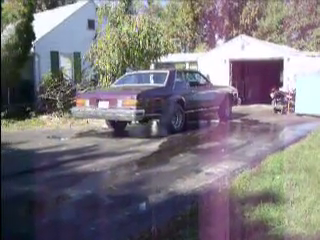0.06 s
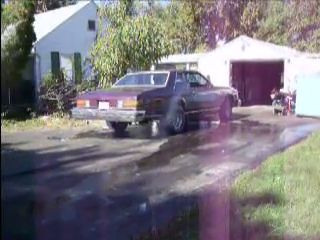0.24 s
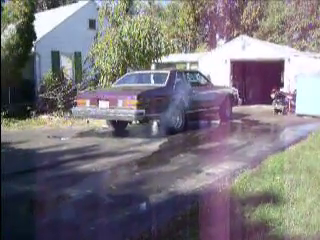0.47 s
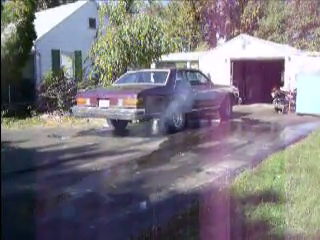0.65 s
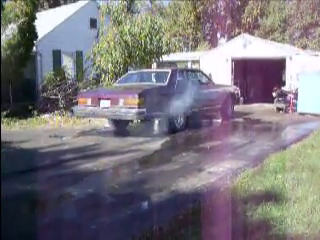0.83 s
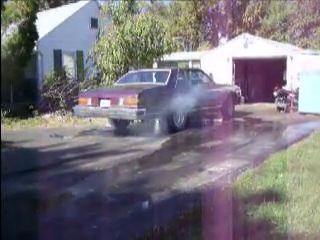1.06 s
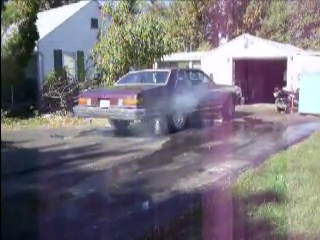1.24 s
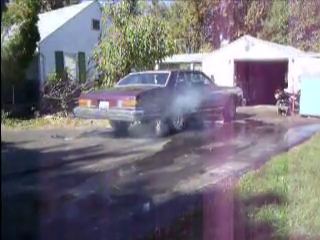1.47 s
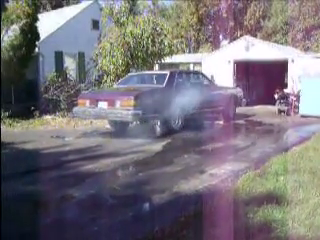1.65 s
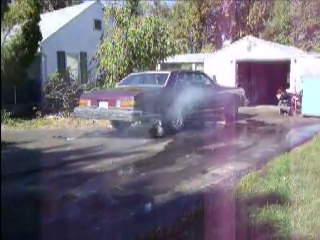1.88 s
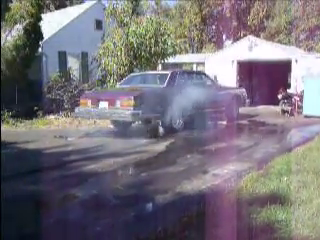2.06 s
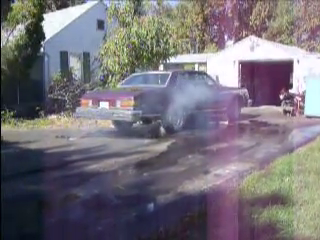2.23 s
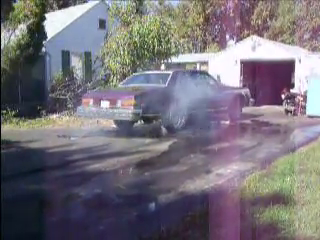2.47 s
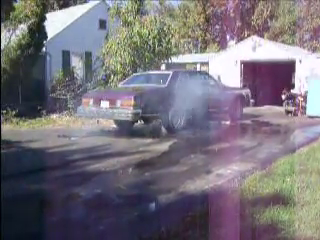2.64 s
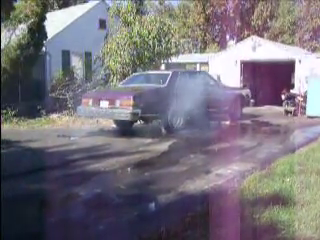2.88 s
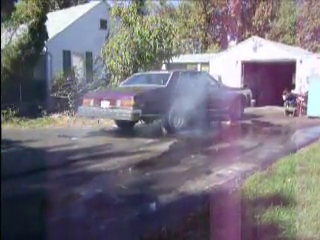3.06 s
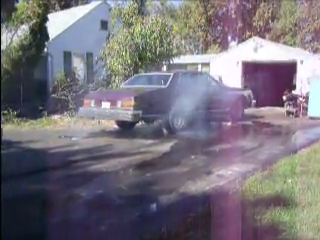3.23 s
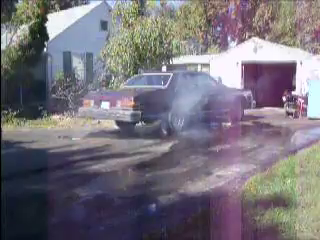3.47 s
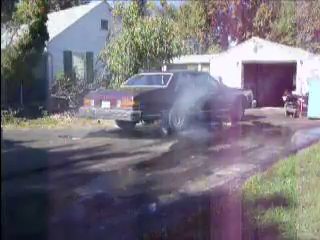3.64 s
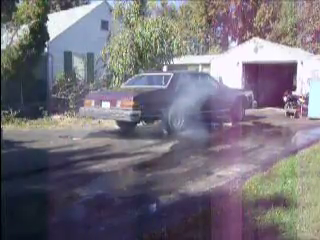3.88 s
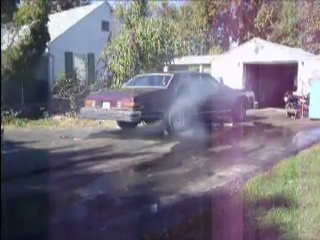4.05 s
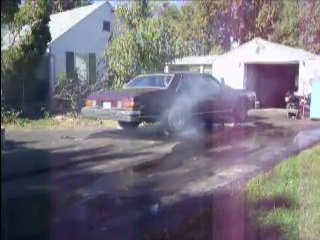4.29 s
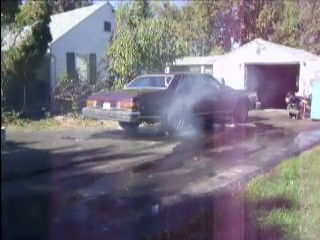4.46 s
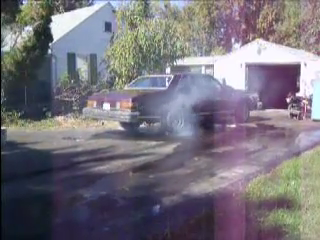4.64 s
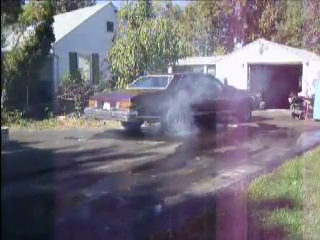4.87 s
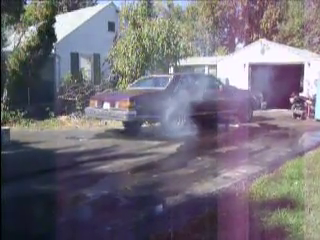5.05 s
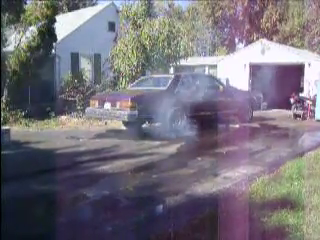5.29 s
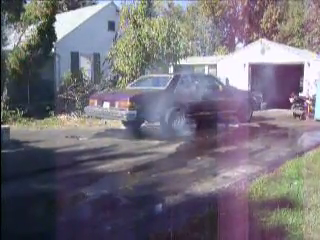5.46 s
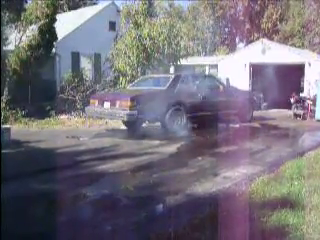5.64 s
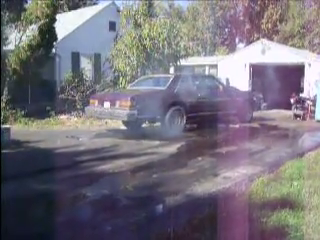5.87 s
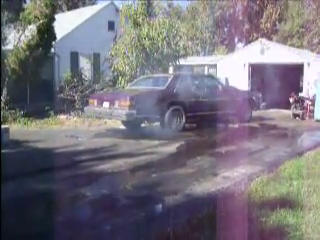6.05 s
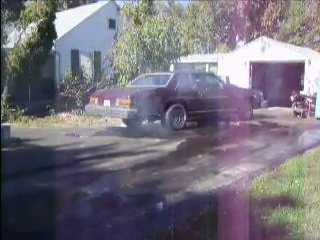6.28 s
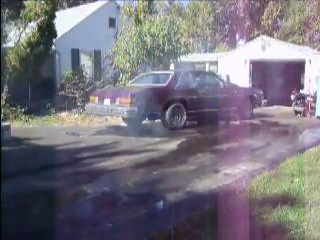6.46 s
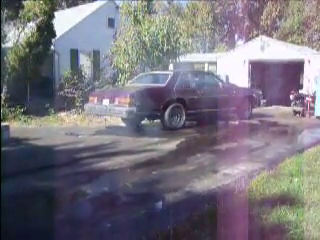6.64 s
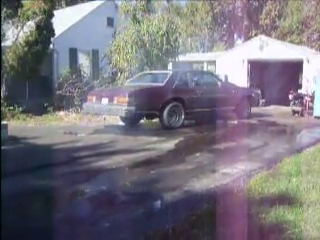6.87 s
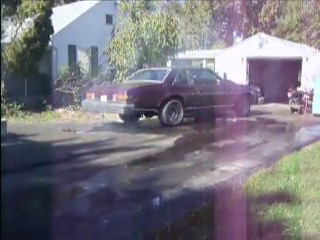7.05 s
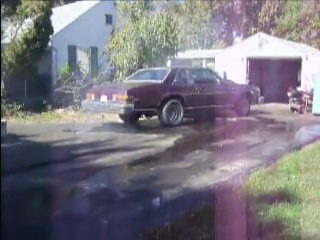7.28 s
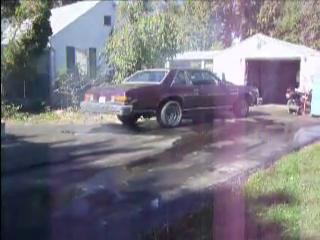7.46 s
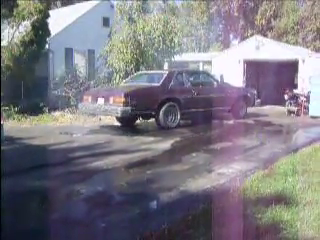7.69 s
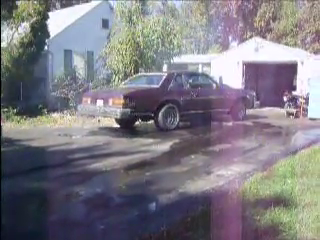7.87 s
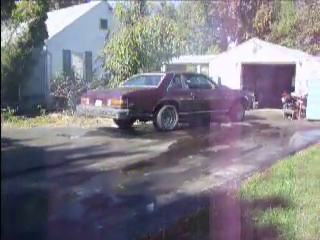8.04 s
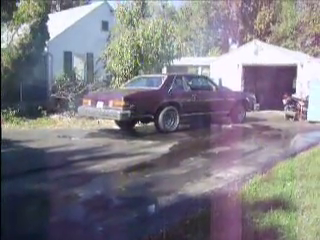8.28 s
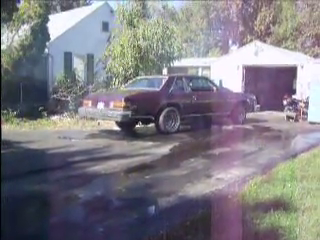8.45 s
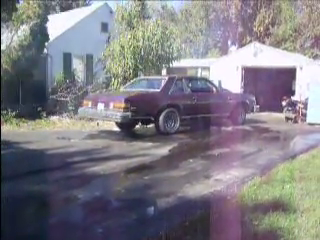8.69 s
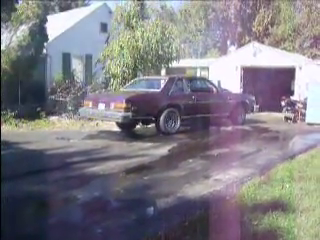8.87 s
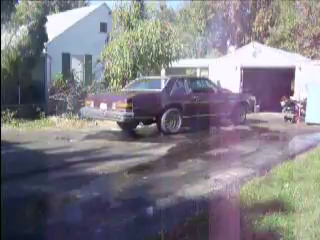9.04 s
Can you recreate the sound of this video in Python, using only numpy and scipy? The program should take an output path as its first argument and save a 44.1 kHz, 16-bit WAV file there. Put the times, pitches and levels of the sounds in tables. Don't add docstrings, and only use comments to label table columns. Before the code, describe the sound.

From 0 s a large eight-cylinder engine is already revving high, a loud, dense, buzzing tone with gas roar and bright hiss. From about 0.6 s load drags it down, sliding roughly an octave by 1.5 s with a shuddering growl. It then holds a lower, harsh, rapid-fire rasp until 4.8 s, its crackle growing slightly near the end. A rough tyre squeal starts around 1.4 s, wavering in short overlapping bites until about 3.5 s, with a lower chirp at 3.8 s and more squeaks from 4.5 to 5 s. The throttle lifts at 4.8 s; the note buckles and drops. After a weak gap near 5.2 s, a lumpy idle settles from 5.7 s to the end at about 9 s: uneven clusters of sharp gas spits, missed beats, rattly rasp and deep pipe booms, quickening slightly at the end. Faint quiet yard air; a small close microphone flattens the loudest peaks.

```python
import sys
import numpy as np
from scipy import signal
from scipy.fft import rfft, irfft, next_fast_len
from scipy.io import wavfile
from scipy.ndimage import uniform_filter1d, map_coordinates

SR = 44100
rng = np.random.default_rng(int(sys.argv[2]) if len(sys.argv) > 2 else 0)


def waveform_to_disk(signal):
    frames = np.transpose(np.atleast_2d(signal))
    scaled = np.clip(frames, -1, 1) * 32767
    samples = np.round(scaled).astype(np.int16)
    wavfile.write(sys.argv[1], SR, samples)


def gain_from_db(level_db):
    decades = np.asarray(level_db, float) / 20
    return 10 ** decades


N = 402191
T = np.arange(N) / SR

# frequency in Hz, level in dB per Hz.
CRACK_COLOUR = [(2500, -44), (4500, -11.5), (5500, -3), (6800, -9.5), (8800, -2), (11000, -12.5),
                (12400, -38), (16000, -120)]


def unit(x):
    return x / np.sqrt(np.mean(x ** 2) + 1e-20)


def along(points, hz):
    f, v = np.transpose(points)
    return np.interp(np.log(hz + 1), np.log(f), v)


def wobble(rate):
    return map_coordinates(rng.standard_normal(int(N * rate / SR) + 4), [T * rate])


def filtered(x, response):
    m = next_fast_len(N + SR // 2)
    return irfft(rfft(x, m) * response(np.fft.rfftfreq(m, 1 / SR)), m)[:N]


def resonances(modes):
    def response(f):
        total = 0
        for k, (centre, width, db) in enumerate(modes):
            damping = 1j * f * width
            total = total + (-1) ** k * gain_from_db(db) * damping / (centre * centre - f * f + damping)
        return total
    return response


def noise(spectrum, patchy_db=0, crackle_db=0):
    z = signal.stft(gain_from_db(crackle_db * wobble(680)) * rng.standard_normal(N), nperseg=256)[2]
    field = uniform_filter1d(uniform_filter1d(rng.standard_normal(z.shape), 5, 0), 6, 1)
    raw = signal.istft(z * gain_from_db(patchy_db * unit(field)), nperseg=256)[1][:N]
    return unit(filtered(raw, lambda hz: gain_from_db(along(spectrum, hz))))


def puffs(times, db, rise, t60, echo_db, echo_t60):
    t = T[:SR // 3]
    decay = gain_from_db(-60 * t / t60) + gain_from_db(echo_db - 60 * t / echo_t60)
    shape = (1 - np.exp(-(t / rise) ** 2)) * decay
    kicks = np.bincount((times * SR).astype(int), gain_from_db(db) ** 2, N)[:N]
    power = signal.fftconvolve(kicks, (shape / shape.max()) ** 2)[:N]
    return np.sqrt(np.abs(power))


def evened(envelope):
    return envelope / np.sqrt(np.abs(uniform_filter1d(envelope ** 2, SR // 6)) + 1e-6)


def revving():
    # time in seconds, engine cycles per second.
    speed_points = [(0, 34.4), (.54, 33.6), (.65, 33.3), (.79, 31.7), (1.02, 27), (1.19, 22.9),
                    (1.41, 19.4), (1.53, 17.9), (1.67, 17.6), (1.95, 17.4), (2.29, 17.3), (2.7, 17.7),
                    (3.37, 17.4), (4.5, 17.1), (4.8, 16.6), (4.91, 15.5), (4.97, 13.8), (5.1, 8.62)]
    # multiple of the cycle, level in dB.
    free_orders = [(1, -25), (2, -22), (3, -13), (4, -55), (5, -1), (6, -10), (7, -15), (8, 1.5), (9, -5),
                   (10, -43), (11, -11.5), (12, -9.5), (13, -12), (14, -42), (15, -16), (16, -52),
                   (17, -15), (18, -7), (19, -4), (20, -8), (21, -1.5), (22, -10), (23, -9), (24, -27),
                   (25, -28), (26, -11), (27, -15.5), (28, -11.5)]
    # multiple of the cycle, level in dB.
    loaded_orders = [(1, -31), (2, -40.5), (3, -24), (5, -5.5), (6, -12.5), (7, -7), (8, 1), (9, -7),
                     (10, -11.5), (11, -6), (12, -19.5), (13, -13), (14, -11.5), (15, -15), (17, -20),
                     (19, -21), (21, -20), (22, -27), (23, -28.5), (24, -22), (27, -30), (31, -23),
                     (34, -25), (36, -11.5), (37, -16.5), (38, -32.5), (39, -15), (43, -19), (44, -17),
                     (46, -22.5)]
    # push in dB, spit in dB.
    bank = [(-1, -8), (-5, -9), (-5, -5), (-2.5, -10), (-7, -8), (-6, 0), (0, -4), (-4, -1.5)]
    # frequency in Hz, gain in dB.
    pipe_colour = [(30, 6), (70, -5.5), (110, 8.5), (160, 4), (220, 4), (350, 4.5), (500, -6), (750, 9),
                   (1100, -1)]
    # frequency in Hz, level in dB per Hz.
    rumble_colour = [(12, -63), (20, -33), (38, -8), (139, 8), (252, 9.5), (300, -14), (500, -50),
                     (650, -60), (1100, -120)]
    # frequency in Hz, level in dB per Hz.
    roar_colour = [(150, -46), (250, -25), (308, -8), (371, -3.5), (462, -17), (618, -6.5), (793, -2),
                   (1030, -4.5), (1200, -24), (1530, -9.5), (1840, -21.5), (2060, -8), (3000, -31),
                   (3900, -31), (6600, -120)]
    # frequency in Hz, level in dB per Hz.
    hiss_colour = [(1470, -39), (2500, -0.5), (5510, -0.5), (6650, -4.5), (9610, -1), (11100, -7.5),
                   (12400, -33), (16100, -59), (22000, -120)]
    lift_s, fire_out_s, silent_s = 4.809, 4.945, 5.13
    sag_s = 3.8

    speed_hz = np.interp(T, *np.transpose(speed_points))
    load = np.clip((33 - speed_hz) / 15, 0, 1)
    strain = load * (1 - load)
    shut_s = np.clip(T - lift_s, 0, None)
    out = np.clip((T - fire_out_s) / 0.027, 0, 1)
    sagged_s = np.clip(T - sag_s, 0, None)
    sagging = np.clip(T - sag_s, 0, 1)
    fade = np.clip((silent_s - T) / 0.019, 0, 1)

    ripple_db = 1.5 * np.clip(shut_s / .1, 0, 1) * np.cos(2 * np.pi * (T - 4.75) / 0.084)
    tone_db = -16.5 + 1.5 * load - 11 * shut_s + ripple_db - 5.5 * out
    upper_db = -2 + 22 * strain - 60 * shut_s
    shudder = .04 * strain * wobble(30)
    turns = np.cumsum(speed_hz) / SR - .45 + .0015 * wobble(12) + shudder

    push_db, spit_db = np.transpose(bank)
    free, loaded = dict(free_orders), dict(loaded_orders)
    tone = np.zeros(N)
    for k in sorted({**free, **loaded}):
        phase = .9 + np.angle(np.sum(gain_from_db(push_db) * np.exp(-2j * np.pi * k * np.arange(8) / 8)))
        phase -= 2.3 * (k % 2) * (k < 8) / np.sqrt(abs(8 - k) + 1e-9)
        free_db = free.get(k, -30.5) - along(pipe_colour, 35.3 * k)
        loaded_db = loaded.get(k, -45) - along(pipe_colour, 18.9 * k)
        db = free_db + load * (loaded_db - free_db) + along(pipe_colour, k * speed_hz)
        db = db + upper_db * (k > 14) + 1.03 * wobble(6.07)
        db -= 2.5 * sagged_s * (13 < k < 20)
        tone += gain_from_db(db) * np.cos(2 * np.pi * k * turns + phase)
    tone *= gain_from_db(tone_db) * fade

    firing = np.arange(int(8 * np.interp(silent_s, T, turns)))
    times = np.interp(firing / 8, turns, T)
    unevenness = 0.15 + 0.77 * load + 0.21 * sagging
    size_db = spit_db[firing % len(bank)] * np.interp(times, T, unevenness)
    luck = rng.standard_normal((len(firing), 2))
    rasp = evened(puffs(times, 0.7 * size_db + 0.82 * luck[:, 0],
                        rise=0.001, t60=0.064, echo_db=-23, echo_t60=0.09))
    jet = evened(puffs(times, 2.2 * size_db + 2.5 * luck[:, 1],
                       rise=.002, t60=.011, echo_db=-24, echo_t60=.15))

    rumble = gain_from_db(tone_db - 18.5 + 67 * strain) * fade * noise(rumble_colour)
    roar = gain_from_db(-27.5 - 92 * shut_s) * rasp * noise(roar_colour, patchy_db=2.0)
    jet_db = -31 + 0.2 * T - 7 * strain + 0.27 * wobble(3.1)
    crack_db = -14.5 + 7 * load + 9 * sagging - 40 * shut_s - 150 * out
    spit = gain_from_db(crack_db) * jet * noise(CRACK_COLOUR)
    hiss = gain_from_db(-111 * shut_s) * rasp * noise(hiss_colour, patchy_db=1.5)
    return tone + rumble + roar + gain_from_db(jet_db) * (spit + hiss)


def firings():
    # first firing in s, fifth firing in s, jet peak in dB, drift in dB per firing.
    idle_cycles = [(4.967, 5.1454, -31.5, -1), (5.3467, 5.5537, -25.5, 1.6), (5.7467, 5.927, -12, 0.1),
                   (6.129, 6.295, -9.5, 0), (6.446, 6.589, -11.5, 0), (6.7366, 6.879, -10, -1),
                   (7.0288, 7.176, -13, 0.5), (7.32, 7.468, -11.5, -0.18), (7.6261, 7.783, -14, 0.16),
                   (7.9672, 8.1258, -11, -0.52), (8.298, 8.4605, -11, 0.04), (8.5815, 8.683, -11, 0),
                   (8.778, 8.8666, -15.5, -.5), (8.967, 9.066, -13, .6)]
    quiet_firings = [(0, 0), (1, 2), (2, 5), (3, 2), (3, 4), (3, 7), (4, 5), (5, 2), (5, 4), (5, 7), (6, 5),
                     (6, 7), (7, 2), (7, 4), (7, 7), (8, 5), (8, 7), (9, 2), (11, 4), (11, 6), (11, 7), (12, 5)]
    # jet in dB, rasp relative to the jet in dB.
    lope = [(-0.5, -16), (-2, -14), (-1, -18), (-3.5, -13.5), (-0.5, -24.5), (-6, -14), (-6, -18),
            (-9.5, -18.5)]
    # cycle number, cylinder number, change in dB.
    odd_ones = [(1, 1, -5), (1, 3, 7), (1, 4, -4), (1, 5, 4), (1, 6, 4), (2, 6, -3), (10, 0, 3), (10, 7, 3),
                (12, 2, -6), (13, 1, -3), (13, 4, -4), (13, 5, 7)]
    next_cycle_s = 9.153

    first, fifth, level_db, drift_db = np.transpose(idle_cycles)
    marks = np.r_[2 * first[0] - fifth[0], np.ravel([first, fifth], "F"), next_cycle_s]
    slot = np.arange(8 * len(idle_cycles))
    cycle, cylinder = np.divmod(slot, len(lope))
    s = map_coordinates(marks, [slot / 4 + 1], mode="nearest")
    quiet = np.isin(slot, [len(lope) * c + k for c, k in quiet_firings])
    jet_db, under_db = np.transpose(lope)[:, cylinder]
    strength_db = level_db[cycle] + drift_db[cycle] * cylinder
    jet_db = jet_db + strength_db + 2 * np.roll(quiet, 1) - 16 * quiet
    for c, k, db in odd_ones:
        jet_db += db * (slot == len(lope) * c + k)
    rasp_db = jet_db + under_db + 2 * rng.standard_normal(len(slot))
    return s, jet_db, rasp_db, quiet, np.interp(T, s, slot), np.interp(T, s, strength_db)


def idling():
    # frequency in Hz, level in dB per Hz.
    jet_colour = [(1470, -8), (2500, -7.5), (4790, 1.5), (5700, -2), (6600, -4), (8920, -4.5), (11000, -9),
                  (12400, -33), (16100, -60), (22000, -120)]
    # frequency in Hz, level in dB per Hz.
    rasp_colour = [(120, -45), (200, -2.5), (254, -11), (315, -6), (437, -9), (561, -10.5), (657, -10.5),
                   (770, 1.5), (1010, -11), (1230, -24.5), (1550, -7.5), (1780, -43), (2090, -11.5),
                   (2620, -17), (3000, -11.5), (3900, -15), (6600, -120)]
    # frequency in Hz, level in dB.
    hum_colour = [(22, -36), (38, -30), (52, -31), (75, -23.5), (97, -19), (130, -13), (165, -38)]
    # frequency in Hz, width in Hz, level in dB.
    boom_modes = [(98.6, 29, 2.5), (151, 35, -16.5), (167, 12, -5.5)]
    # frequency in Hz, width in Hz, level in dB.
    shell_modes = [(310, 16, 0), (555, 20, -6), (765, 28, 0), (985, 30, -5), (1550, 50, -12),
                   (2120, 50, -9)]

    s, jet_db, rasp_db, quiet, count, strength_db = firings()
    hiss = puffs(s - .006, jet_db - 16, rise=0.013, t60=0.05, echo_db=-17.5, echo_t60=0.28)
    crack = puffs(s - .003, 1.6 * jet_db - 4, rise=.011, t60=.017, echo_db=-30, echo_t60=.05)
    jet = hiss * noise(jet_colour, patchy_db=3.5, crackle_db=-2.0)
    jet += crack * noise(CRACK_COLOUR, patchy_db=3, crackle_db=2.0)

    rasp = puffs(s - .002, rasp_db - 1.5, rise=0.0019, t60=0.075, echo_db=9.5, echo_t60=0.23)
    rasp *= noise(rasp_colour, patchy_db=2.5, crackle_db=-1.0)
    knocks = puffs(s, rasp_db + 21.5, rise=0.0046, t60=0.053, echo_db=-29, echo_t60=0.067)
    shell = filtered(knocks * rng.standard_normal(N), resonances(shell_modes))

    pace_hz = uniform_filter1d(np.gradient(count) * SR, SR // 20)
    hum = np.zeros(N)
    for k in range(1, 5):
        hum_db = along(hum_colour, k * pace_hz) - 3 * k + 4 * wobble(13)
        hum += gain_from_db(hum_db) * np.sin(2 * np.pi * k * (count - .3))
    hum *= gain_from_db(0.46 * (strength_db + 11.5)) * np.clip((T - 5.2) / 0.086, 0, 1)

    def pipe(f):
        return resonances(boom_modes)(f) * (1j * f / (60 + 1j * f)) ** 2 / (1 + 1j * f / 170) ** 4

    push_db = 0.32 * rasp_db + 46.5 + 6 * quiet
    pushes = np.bincount(((s + 0.0042) * SR).astype(int), gain_from_db(push_db), N)[:N]
    boom = -filtered(pushes, pipe)
    mutter = unit(filtered(rng.standard_normal(N), lambda f: pipe(f) ** 2))
    mutter *= gain_from_db(-26 + .2 * (strength_db + 13.5)) * np.clip((T - 4.95) / 0.088, 0, 1)
    return jet + rasp + shell + hum + boom + mutter


def tyre():
    # start in s, length in s, second partial from Hz, to Hz, level in dB.
    bites = [(1.409, .13, 4250, 3670, -23.5), (1.517, 0.057, 3840, 4300, -26.5),
             (1.585, 0.091, 3880, 3940, -24), (1.69, .07, 4320, 3890, -21.5), (1.749, 0.1, 4070, 4420, -28),
             (1.863, 0.17, 4140, 4070, -27.5), (2.029, .15, 3980, 3920, -28.5),
             (2.211, 0.102, 4020, 3900, -27.5), (2.31, 0.097, 3940, 3680, -25),
             (2.39, 0.092, 3650, 4080, -24), (2.47, 0.18, 3760, 3490, -27), (2.658, .25, 3980, 3910, -27.5),
             (2.898, 0.21, 3740, 3600, -32.5), (3.15, 0.079, 3570, 3620, -32),
             (3.214, 0.11, 3500, 3350, -34), (3.367, 0.17, 3600, 3430, -43), (4.524, 0.1, 4050, 3720, -31),
             (4.632, 0.088, 3740, 3650, -32), (4.68, .06, 3050, 3350, -33), (4.709, 0.093, 4170, 4150, -33),
             (4.794, 0.126, 3690, 3720, -31), (4.903, 0.0762, 3640, 3800, -38)]
    # centre in s, frequency in Hz, level in dB, length in s.
    chirps = [
        (1.453, 2130, -26, 0.048),
        (1.56, 2140, -26.5, 0.071),
        (3.783, 1537, -26.5, 0.045),
        (4.475, 1580, -29, 0.036),
        (4.71, 1550, -29, 0.037),
        (4.757, 2100, -45, .08),
        (4.993, 1870, -44, .08),
    ]
    edge_s = .02
    out = np.zeros(N)
    apart = np.clip((T - 1.6) / .5, .55, 1.2)
    stray = [apart * (.03 * wobble(300) + .035 * wobble(25)) for block in range(3)]
    grips = [gain_from_db(4 * wobble(90)) for block in range(3)]
    for s, length, from_hz, to_hz, db in bites:
        part = slice(int((s - edge_s) * SR), int((s + length + edge_s) * SR))
        t = T[part] - s
        on = np.clip(np.minimum(t, length - t) / (2 * edge_s) + .5, 0, 1)
        glide_hz = from_hz + (to_hz - from_hz) * t / length
        for drift, grip in zip(stray, grips):
            turn = np.pi * np.cumsum(glide_hz * (1 + drift[part])) / SR
            slips = gain_from_db(-9) * np.sin(turn) + np.sin(2 * turn) + gain_from_db(-7.5) * np.sin(3 * turn)
            out[part] += on * gain_from_db(db - 8.5) * grip[part] * slips
    for s, hz, db, length in chirps:
        turn = 2 * np.pi * np.cumsum(hz * (1 + .022 * wobble(200))) / SR
        swell = np.exp(-((T - s) / (length / 2)) ** 2)
        out += gain_from_db(db) * swell * (np.sin(turn) + gain_from_db(-5) * np.sin(2 * turn))
    return out


def yard():
    # frequency in Hz, level in dB per Hz.
    yard_colour = [(180, -45), (300, -14), (706, -0.5), (1180, -15.5), (1880, -13.5), (10600, -27),
                   (12400, -45), (16100, -75), (22000, -120)]
    return gain_from_db(-50.5) * noise(yard_colour)


def scene():
    return (revving() + idling() + tyre() + yard())[None]


def low_pass(x):
    return signal.sosfilt(signal.butter(12, 12540, fs=SR, output="sos"), x)


def record(dry):
    clipped = dry / (1 + np.abs(dry / 0.48) ** 8) ** (1 / 8)

    def colour(hz):
        return gain_from_db(along([(1500, 0.23), (5000, 0.73)], hz)) / (1 + (hz / 12400) ** 60)

    return low_pass(filtered(clipped[0], colour)[None])


dry = scene()
out = record(dry)
waveform_to_disk(out)
```